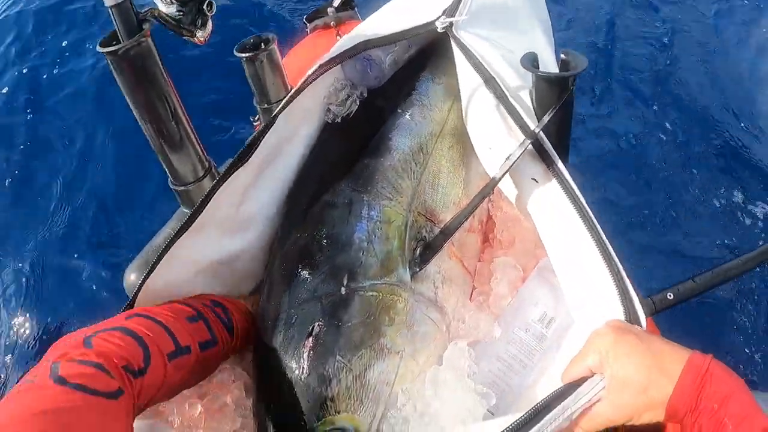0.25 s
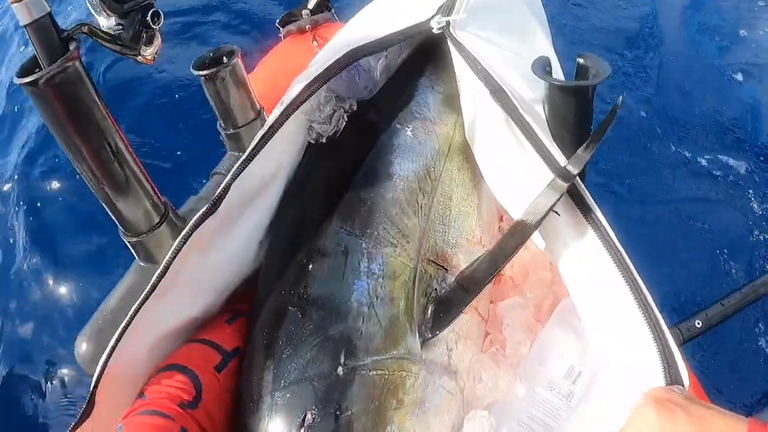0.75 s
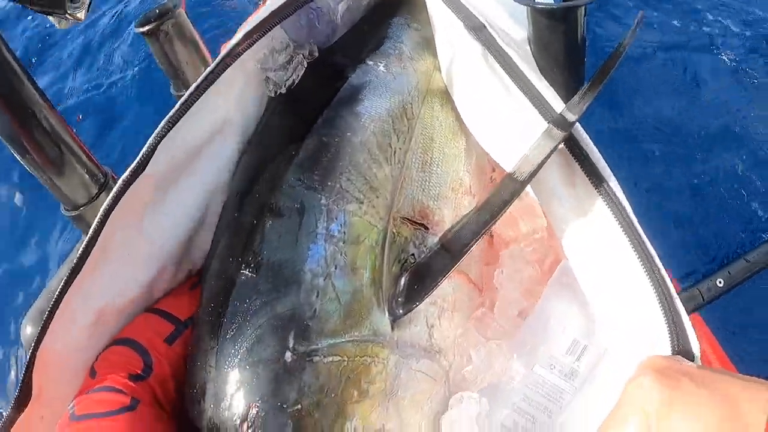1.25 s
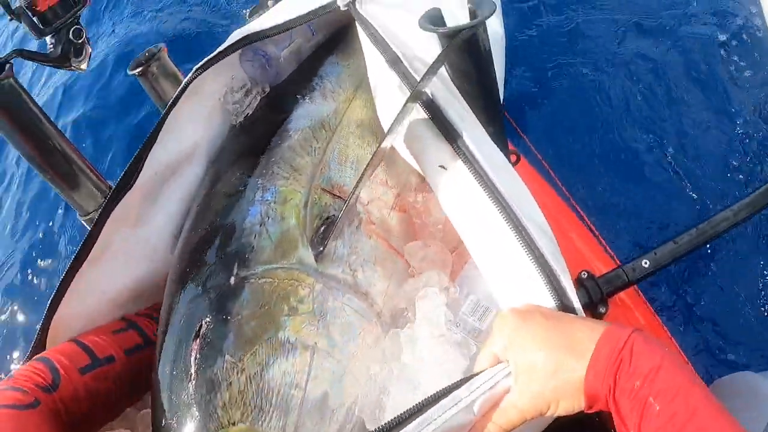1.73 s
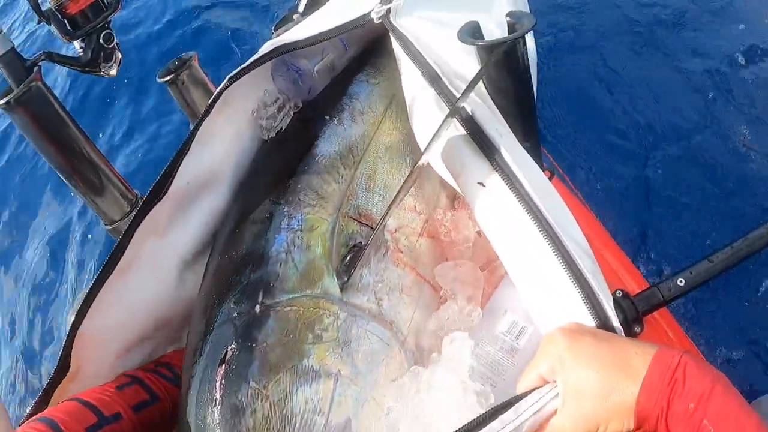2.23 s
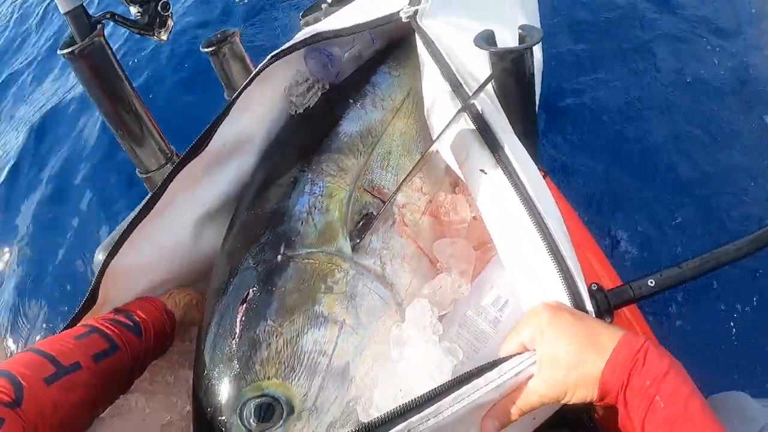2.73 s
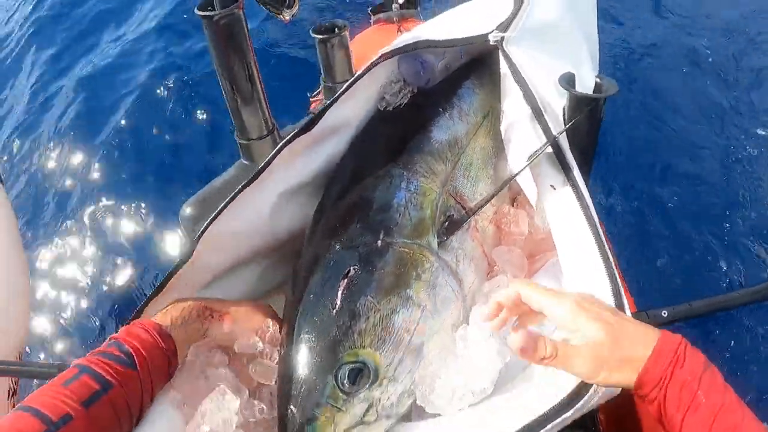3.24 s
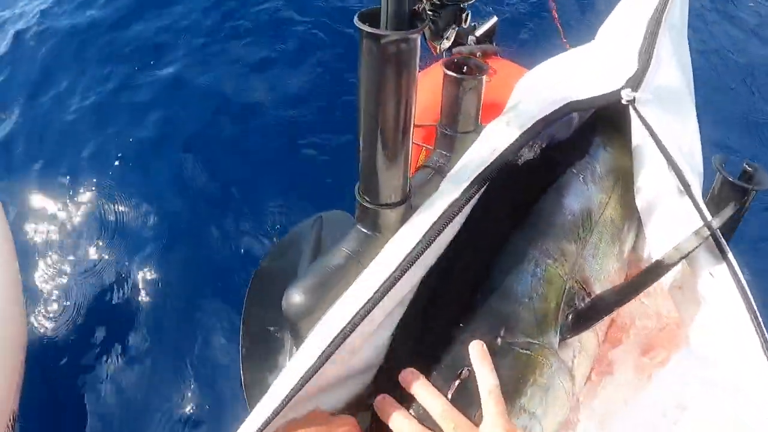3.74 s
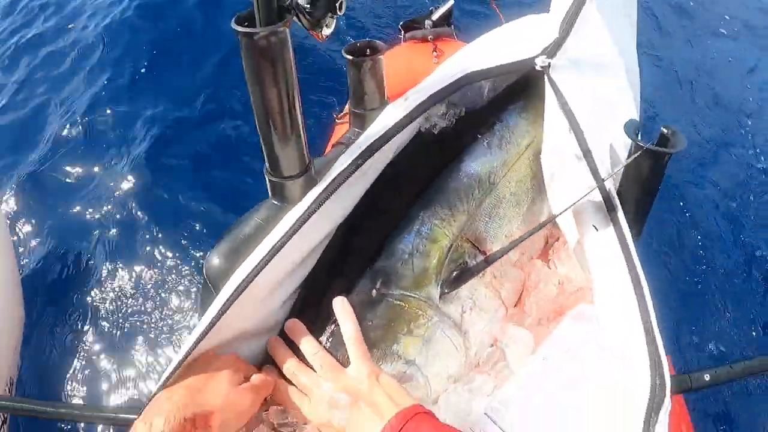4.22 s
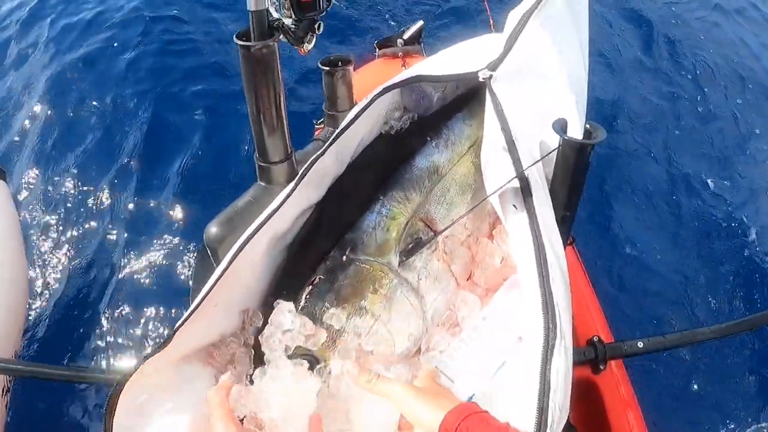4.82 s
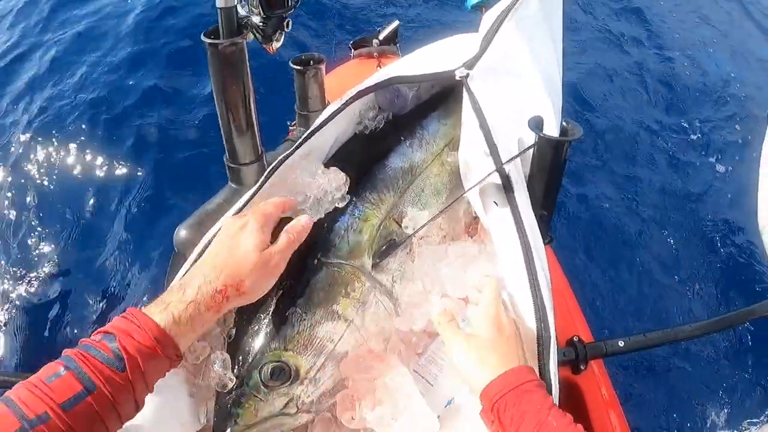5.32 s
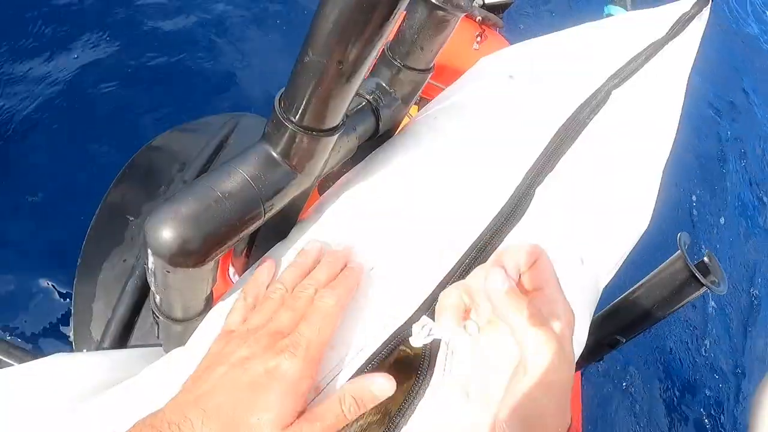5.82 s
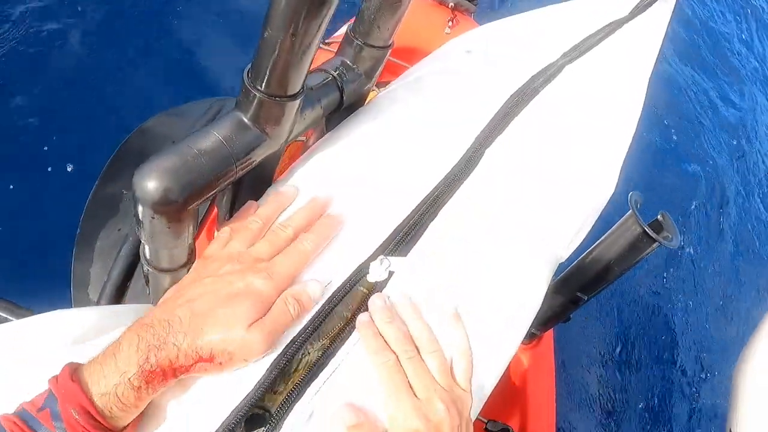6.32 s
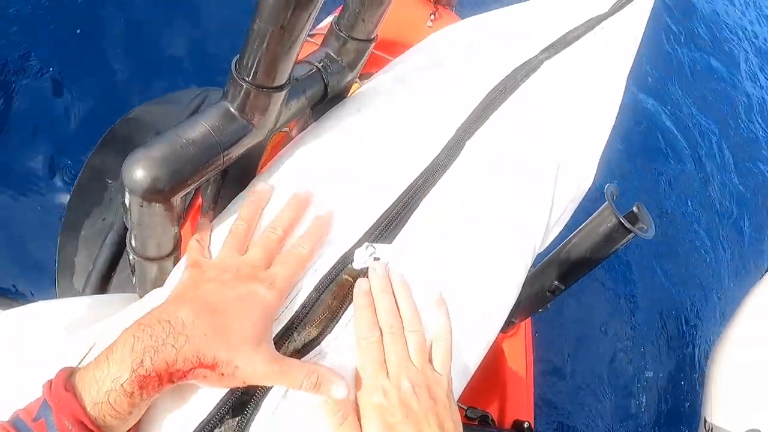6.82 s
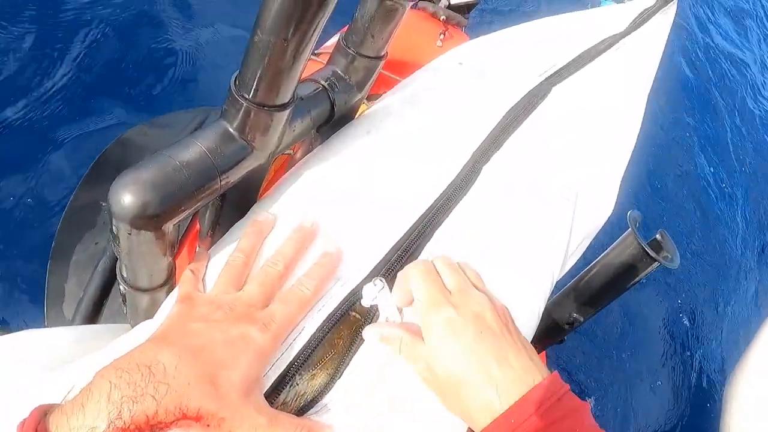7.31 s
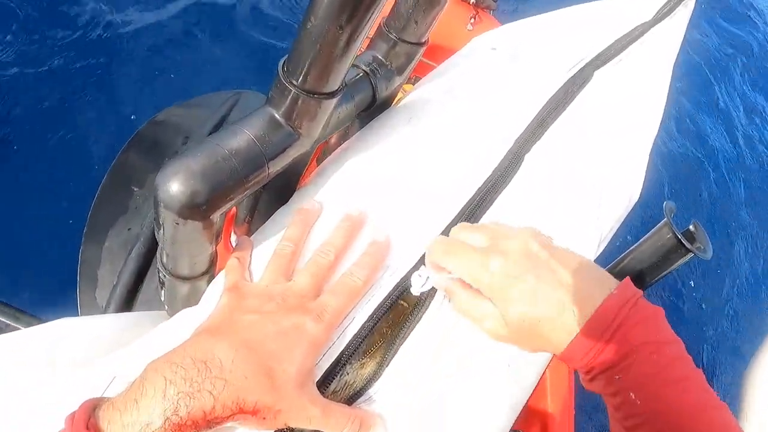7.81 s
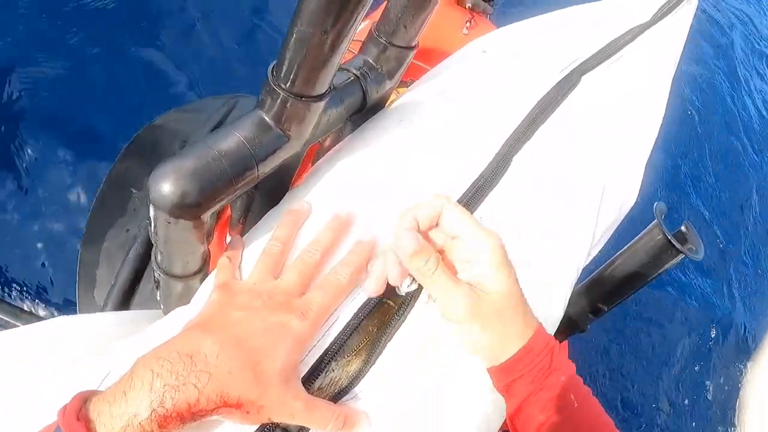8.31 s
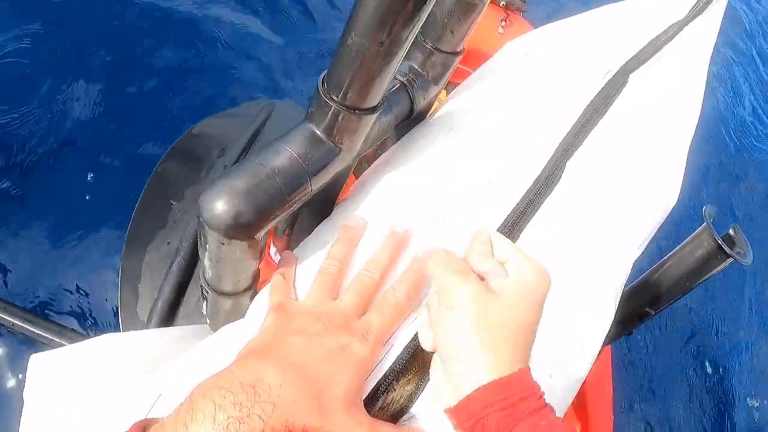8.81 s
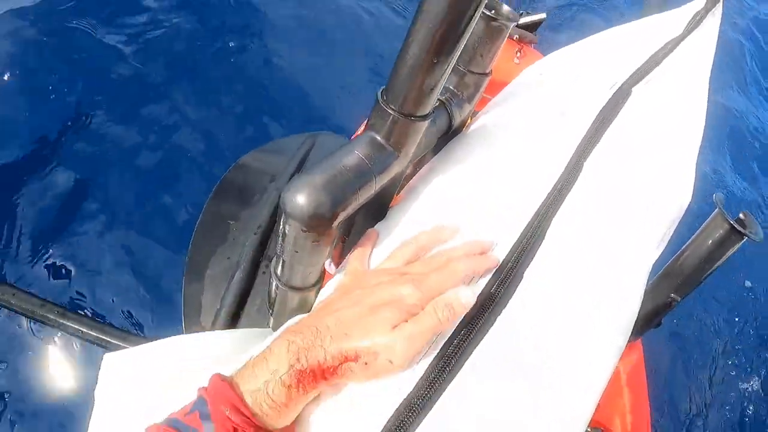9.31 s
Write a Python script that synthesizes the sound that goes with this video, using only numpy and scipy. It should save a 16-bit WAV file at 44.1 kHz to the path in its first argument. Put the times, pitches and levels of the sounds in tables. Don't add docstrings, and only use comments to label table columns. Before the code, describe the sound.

Close on a small boat at sea, hands push through wet crushed ice in a soft bag: slushy surges, dense clatter, heavy lumps and brittle cracks, with low wind rumbling on the microphone. Near six seconds it cuts to quieter handling of the closed bag: groaning vinyl, rubbery squeaks, small ticks, faint water blips, hollow hull thumps and a short zipper ratchet, ending in squeaks and a hard push.

```python
import sys
import numpy as np
from scipy import signal
from scipy.fft import rfft, irfft, next_fast_len
from scipy.io import wavfile
from scipy.ndimage import uniform_filter1d, map_coordinates

SR = 44100
rng = np.random.default_rng(int(sys.argv[2]) if len(sys.argv) > 2 else 0)


def ratio(d):
    e = np.asarray(d, float) / 20
    return 10 ** e


def unload_wav(signal):
    wavfile.write(
        sys.argv[1],
        SR,
        np.round(np.clip(np.atleast_2d(signal).T, -1, 1) * 32767).astype(np.int16),
    )


N = 421155
T = np.arange(N) / SR


def unit(x):
    return x / np.sqrt(np.mean(x ** 2) + 1e-20)


def curve(rows):
    s, value = np.transpose(rows)
    return np.interp(T, s, value)


def along(points, hz):
    at, db = np.transpose(points)
    return ratio(np.interp(np.log(hz + 1), np.log(at + 1), db))


def window(t0, t1, fade):
    return np.clip((T - t0) / fade, 0, 1) * np.clip((t1 - T) / fade, 0, 1)


def wobble(rate):
    return map_coordinates(rng.standard_normal(int(N * rate / SR) + 4), [T * rate])


def bandpass(x, low_hz, high_hz):
    return signal.sosfilt(signal.butter(2, [low_hz, high_hz], "bandpass", fs=SR, output="sos"), x)


def coloured(x, spectrum):
    size = next_fast_len(N + 8192)
    gain = along(spectrum, np.fft.rfftfreq(size, 1 / SR))
    return unit(irfft(rfft(x, size) * gain, size)[..., :N])


def gritty(per_second, spread_db, share, life):
    sizes = ratio(spread_db * np.minimum(rng.exponential(size=N), 2.6))
    hits = (rng.random(N) < per_second / SR) * sizes
    age = np.arange(SR // 20) / SR / life
    swell = unit(signal.fftconvolve(hits, age * np.exp(-age))[:N])
    return rng.standard_normal(N) * np.sqrt(1 - share + share * swell ** 2)


def swells(rows, rise, fall, bed_db):
    t = T[::64, None]
    s, hold, db, *cols = np.transpose(rows)
    row_db = db - rise * np.maximum(s - t, 0) - fall * np.maximum(t - s - hold, 0)
    power = ratio(2 * row_db) + ratio(2 * bed_db) / len(s)
    total = power.sum(axis=1)
    values = [10 * np.log10(total)] + [power @ c / total for c in cols]
    return [np.interp(T, t[:, 0], v) for v in values]


def spread(mid, side, pan_db=0):
    return np.array([(mid + side) * ratio(pan_db / 2), (mid - side) * ratio(-pan_db / 2)])


def add(out, s, sound, pan_db=0):
    at = round(s * SR)
    out[:, at:at + len(sound)] += (ratio([[pan_db / 2], [-pan_db / 2]]) * sound)[:, :N - at]


def ring(hz, t60, attack):
    t = np.arange(SR // 10) / SR
    return np.sin(2 * np.pi * hz * t) * ratio(-60 * t / t60) * (1 - np.exp(-t / attack))


def crack(t60, hz):
    t = np.arange(SR // 10) / SR
    noise = rng.standard_normal(len(t)) * ratio(-60 * t / t60) * (1 - np.exp(-t / 0.0002))
    burst = bandpass(noise, hz * 0.5, min(hz * 1.37, 9600))
    return burst / np.abs(burst).max()


# start in seconds, hold in seconds, buffet level in dB.
GUSTS = [(0, 0.67, -28.5), (1.15, 1.25, -43.5), (2.5, 1.2, -37.5), (3.6, 0.13, -25), (3.9, 0.21, -23.5),
         (4.4, 0.011, -27.5), (4.85, 0.093, -30), (5.2, 0.36, -37), (5.9, 0.043, -39), (6.06, 0.23, -28.5),
         (6.85, 0.081, -36), (7.38, 0.44, -42.5), (8.14, .02, -45.5), (8.6, 0.54, -51), (9.42, 0.12, -33.5)]
# frequency in Hz, density in dB per Hz.
BUFFET = [(8.8, -35), (15, -2.5), (54, -0.5), (130, -10.5), (222, -19.5), (244, -17), (400, -32),
          (520, -28), (880, -120)]


def wind():
    level_db = swells(GUSTS, rise=89, fall=94, bed_db=-59)[0] + 3.4 * wobble(16)
    mid, side = coloured(rng.standard_normal((2, N)), BUFFET)
    return ratio(level_db) * spread(mid, .52 * side)


def pings(count, level_db):
    out = np.zeros((2, N))
    for when, size, softness in rng.random((count, 3)):
        s, hz = 5.7 * when, 850 * 6.48 ** size
        ping = ring(hz, 24 / hz, 0.0012)[:SR // 20]
        add(out, s, ratio(level_db[round(s * SR)] - 24.0 * softness) * ping)
    return out


# start in seconds, hold in seconds, slosh level in dB, clatter above slosh in dB.
SHOVES = [(0, 0.086, -36, -2.5), (.12, 0.32, -36, 4), (.5, 0.47, -31.5, -3), (1.14, 0.063, -21.5, -0.5),
          (1.29, 0.1, -29, -3), (1.43, 0.006, -24.5, 0.5), (1.66, 0.073, -23.5, 2), (1.56, 0.028, -25, 0.5),
          (1.78, 0.25, -27, 1.5), (2.14, 0.13, -31, 0), (2.28, .01, -28, -0.5), (2.36, 0.21, -30, -2.5),
          (2.67, 0.07, -25.5, 0.5), (3.0, 0.089, -26.5, -1), (3.2, 0.22, -30.5, -6),
          (3.64, 0.017, -25.5, -4), (3.81, 0.14, -19, -6), (4.0, 0.15, -29.5, -5.5),
          (4.33, 0.0035, -27.5, -7.5), (4.42, 0.33, -33.5, 0.5), (4.81, 0.022, -22, -3),
          (5.03, 0.0071, -26, -3), (5.1, 0.11, -34, -4.5), (5.29, 0.095, -30, -2),
          (5.46, 0.08, -34.5, -7.5), (5.6, 0.021, -41.5, -5.5), (5.78, 0.012, -37.5, -7)]
# start in seconds, length in seconds, level change in dB.
PAUSES = [
    (1.225, 0.055, -1),
    (1.483, 0.05, -2.5),
    (2.726, 0.13, -6),
]
# time in seconds, treble gain in dB.
BRIGHT = [(0, 7), (.45, 3), (.9, -7.5), (2.3, -2.5), (2.7, 2), (4.5, 3), (5.05, 7.5), (5.8, 3.5)]
# frequency in Hz, density in dB per Hz.
SLOSH = [(60, -16.5), (175, 0.5), (474, -5.5), (606, -2.5), (1390, -15.5), (1670, -24), (2000, -22),
         (2600, -30), (4400, -120)]
# frequency in Hz, density in dB per Hz.
CLATTER = [(410, -5.5), (700, -5.5), (1390, -7), (1670, -6.5), (3630, -12), (6350, -22.5), (8230, -24.5),
           (11400, -39.5), (13600, -26.5), (15500, -55)]


def shovelled_ice():
    slosh_db, clatter_db = swells(SHOVES, rise=110, fall=138, bed_db=-47)
    for s, length, db in PAUSES:
        slosh_db = slosh_db + db * window(s, s + length, 0.011)
    clatter_db = slosh_db + clatter_db
    surge = wobble(22.09)

    water = coloured(gritty(200, spread_db=2.5, share=0.54, life=0.0027), SLOSH)
    slosh = ratio(slosh_db + 0.62 * surge + 1.03 * wobble(30)) * water

    large, small = [coloured(gritty(450, spread_db=5, share=0.54, life=0.0014), CLATTER) for _ in range(2)]
    large = signal.sosfilt(signal.butter(2, 3100, "low", fs=SR, output="sos"), large)
    small = signal.sosfilt(signal.butter(2, 3100, "high", fs=SR, output="sos"), small)
    clatter = large + ratio(curve(BRIGHT) + 1.48 * wobble(35)) * small
    clatter = ratio(clatter_db + surge) * clatter
    flow = 0.8 * (slosh + clatter) * window(-1, 5.82, 0.017)
    return flow + pings(count=1100, level_db=clatter_db + 12.5)


# time in seconds, peak in dB, ring in Hz.
LUMPS = [(0.511, -13.5, 950), (1.051, -6, 610), (2.67, -11, 248), (2.868, -17, 243), (3.064, -8, 774),
         (4.808, -16, 420), (4.878, -12, 450), (4.918, -11, 378), (4.988, -12, 480), (5.029, -10.5, 190),
         (5.118, -17, 430), (5.143, -19, 400), (5.334, -10, 420), (5.19, -12.5, 244), (5.228, -11.5, 268),
         (5.296, -4.5, 448), (5.311, -3.5, 338), (5.363, -2.5, 243), (5.383, -5.5, 186), (5.635, -19, 377)]


def lumps():
    out = np.zeros((2, N))
    for s, db, hz in LUMPS:
        add(out, s, ratio(db - 2.5) * (ring(hz, 6 / hz, 0.00065) + 0.51 * crack(0.04, 1.54 * hz)))
    return out


# time in seconds, peak in dB, ring in Hz.
CHIPS = [(1.0535, -23, 2240), (4.036, -20, 2720), (4.193, -19.5, 3780), (4.3987, -19, 3460),
         (4.8274, -19, 2330), (4.9344, -20, 4300), (5.101, -20, 1890), (5.1993, -11.5, 2000),
         (5.214, -12, 3610), (5.243, -18, 1990), (5.2742, -15, 3780), (5.2859, -16, 2760),
         (5.3158, -15, 2040), (5.341, -9.5, 3550), (5.363, -10, 2370), (5.448, -13, 3070),
         (5.523, -16.5, 4260)]


def chips():
    out = np.zeros((2, N))
    for s, db, hz in CHIPS:
        add(out, s, ratio(db - 3.0) * (0.51 * ring(hz, 0.028, 0.00045) + 0.8 * crack(0.04, hz)))
    return out


# start in
# seconds, length in seconds, level in dB, band centre in Hz, width in octaves.
RUBS = [(5.785, 0.016, -40.5, 2400, .8), (5.958, 0.034, -48, 900, 1.2), (6.149, 0.035, -43, 1300, 1.4),
        (6.499, 0.021, -50.5, 1100, 1.1), (7.16, 0.038, -42.5, 4860, 0.36), (7.536, 0.027, -48, 1780, 0.84),
        (7.768, 0.11, -42.5, 324, 1), (7.821, 0.053, -49, 955, .6), (8, .11, -42.5, 320, 0.81),
        (8.09, 0.065, -49, 1270, 1), (8.176, 0.033, -45.5, 600, 1.1), (8.238, 0.056, -43.5, 1090, 1),
        (8.26, .045, -42.5, 170, .7), (9.112, 0.061, -39.5, 6600, 0.44), (9.321, 0.16, -36.5, 7000, 0.41),
        (9.432, 0.036, -35, 4680, .15), (9.4, 0.093, -35, 3900, .3), (9.125, 0.055, -31.5, 1330, 0.43),
        (9.419, 0.065, -37, 2260, .15), (1.131, .09, -31, 2240, 0.43), (1.1, 0.12, -29, 185, 0.54),
        (1.582, 0.17, -30.5, 1600, 0.52), (2.5, 0.19, -34, 192, 0.32), (4.76, 0.065, -27.5, 1050, .8)]


def rubs():
    out, t = np.zeros((2, N)), np.arange(SR // 3) / SR
    for s, length, db, hz, octaves in RUBS:
        noise = rng.standard_normal(len(t))
        noise = unit(bandpass(noise, hz * 2 ** (-octaves / 2), hz * 2 ** (octaves / 2)))
        noise = noise * ratio(2.5 * wobble(44.3)[:len(t)])
        stroke = np.clip(t / 0.011, 0, 1) * np.clip((length - t) / 0.013 + 1, 0, 1)
        add(out, s, ratio(db) * noise * stroke, rng.normal(-1.6, 2.6))
    return out


def stick_slip(rates, strokes, roughness, falls, radiation, hiss_spectrum, folds, jitter, fade):
    tone, gate, snaps = np.zeros((3, N))
    for rows, (level_db, swell_db, hiss_db), rough, fall_db in zip(rates, strokes, roughness, falls):
        t0, t1 = rows[0][0], rows[-1][0]
        live = window(t0, t1, fade)
        hz = uniform_filter1d(curve(rows), size=170)
        swell = swell_db * np.clip((T - t0) / (t1 - t0) - .5, -1, 1)
        grip = 8.5 * (1 - window(t0, t1, 0.017))
        db = level_db + swell - grip
        phase = 2 * np.pi * np.cumsum(hz * (1 + jitter * rough * wobble(300))) / SR
        stack = np.zeros(N)
        for k in range(1, 7):
            gain = radiation(k * hz) * ratio(12.7 * rough * wobble(70) - fall_db * (k - 1))
            stack += gain * np.cos(k * phase + 0.68 * k * k)
        tone += live * ratio(db) * stack / np.sqrt(np.mean(stack[live > 0] ** 2))
        hiss_gain = live * ratio(db + hiss_db)
        gate += hiss_gain * 1.6 * (.2 + .85 * np.cos(phase / 2) ** 4)
        slips = np.diff(np.floor(phase / (2 * np.pi) + .5), prepend=0)
        snaps += (1 - rough) ** 2 * hiss_gain * slips
    hiss = gate * coloured(rng.standard_normal(N), hiss_spectrum)
    for low_hz, high_hz, fold_db in folds:
        hiss = hiss + ratio(fold_db) * bandpass(snaps, low_hz, high_hz)
    mid = tone + hiss
    return spread(mid, 0.12 * np.roll(mid, 90), pan_db=-0.5)


# time in seconds, rate in slips per second.
FINGER_RATE = [
    [(7.17, 470), (7.185, 464), (7.203, 455)],
    [(7.22, 680), (7.248, 830)],
    [(7.322, 400), (7.336, 350), (7.358, 530), (7.372, 490), (7.392, 290), (7.41, 350), (7.43, 520),
     (7.447, 530)],
    [(8.962, 330), (8.986, 470), (9.0, 415), (9.022, 580), (9.033, 500), (9.052, 400)],
    [(9.06, 330), (9.08, 400), (9.09, 560), (9.104, 830)],
    [(9.12, 420), (9.145, 450), (9.172, 440), (9.195, 250)],
    [(9.312, 300), (9.322, 330), (9.36, 640)],
    [(9.36, 280), (9.375, 335), (9.39, 358), (9.41, 345), (9.467, 435), (9.485, 370), (9.507, 380),
     (9.527, 270), (9.555, 190)],
    [(3.27, 280), (3.31, 470), (3.43, 310)],
    [(9.482, 720), (9.507, 765), (9.527, 550)],
    [(7.535, 720), (7.57, 790)],
    [(7.61, 720), (7.632, 1460)],
]
# level in dB, swell along the stroke in dB, hiss above tone in dB.
FINGER_STROKES = [(-22, 2, -12), (-29, -13, -12), (-25.5, -8, -11), (-18, 5, -9.5), (-26.5, -16, -27),
                  (-27.5, 0, -5.5), (-24.5, 12, -8.5), (-20.5, 2, -6), (-33, -6, -11), (-22, -7, -20),
                  (-39, 0, 1), (-38.5, 4, -1)]
FINGER_ROUGH = [.25, .2, .14, .1, .15, .25, .15, .12, .15, .1, .2, .1]
# fall from one overtone to the next in one stroke, in dB.
FINGER_FALL = [5, 9, 0, 0, 3.5, 9, 9, 0.5, 1, 12, 1, 4]
# frequency in Hz, gain in dB.
VINYL = [(200, -7.5), (450, 4), (750, -10.5), (1080, 0), (1350, -7.5), (1750, -12.5), (2400, -22.5),
         (3500, -41)]
# frequency in Hz, density in dB per Hz.
SCRUB = [(530, -3.5), (900, -3.5), (1650, -2.5), (1910, -24), (2250, -11.5), (3070, -24), (3810, -20),
         (7420, -15.5), (15500, -53)]


def finger_squeaks():
    return stick_slip(FINGER_RATE, FINGER_STROKES, FINGER_ROUGH, FINGER_FALL, lambda hz: along(VINYL, hz),
                      SCRUB, folds=[(3600, 5000, 18)], jitter=0.13, fade=0.0011)


# time in seconds, peak in
# dB, centre in Hz.
CRUMBS = [(4.4656, -16.5, 1860), (4.5745, -26, 2300), (4.6039, -27, 3430), (4.6239, -22, 3250),
          (4.6438, -26, 2470), (4.6643, -15, 2950), (4.6932, -14, 3670), (4.7431, -24, 3470),
          (4.79, -11, 1600), (4.824, -16, 2340),
          (4.8744, -28, 1770), (4.9122, -22, 4070), (4.997, -20, 1620), (5.0344, -10, 1640),
          (5.1516, -26, 1510), (5.2544, -17, 3690), (5.3894, -22, 2200), (5.4231, -27, 2070),
          (5.5825, -29, 4180), (5.6096, -23, 1650), (5.6274, -26, 1540)]


def trickle():
    out = np.zeros((2, N))
    for s, db, hz in CRUMBS:
        add(out, s, ratio(db - 2.5) * crack(.012, hz))
    return out


# time in seconds, peak in dB, pitch in Hz.
DRIPS = [(5.757, -35, 500), (5.77, -35, 950), (5.865, -39, 1100), (5.89, -39, 1200), (5.935, -34, 720),
         (5.948, -37, 410), (6.043, -30.5, 1400), (6.103, -36, 1404), (6.155, -31, 420), (6.463, -35, 430),
         (6.492, -34, 480), (6.511, -32, 466), (6.58, -31, 655), (6.632, -29, 455), (6.66, -31, 1150),
         (6.678, -35, 1500), (7.518, -38, 780), (7.85, -46, 950), (7.935, -46, 1300), (8.11, -37, 1050),
         (8.13, -39, 1140), (8.22, -39, 1250), (8.34, -39, 1050), (8.35, -41, 800), (8.416, -37, 2080),
         (8.452, -38, 259), (8.472, -39, 1000), (8.498, -30, 1540), (8.598, -38, 1150), (8.65, -37, 890),
         (8.665, -32.5, 1120), (8.69, -39, 1350)]


def bubbles():
    out, t = np.zeros((2, N)), np.arange(SR // 16) / SR
    for (s, db, hz), place in zip(DRIPS, rng.random(len(DRIPS))):
        age = t * hz / 2.1
        tone = np.sin(2 * np.pi * hz * t * (1 + 0.015 * age)) * age * np.exp(1 - age)
        add(out, s, ratio(db) * tone, 6 * place - 5)
    return out


# start in seconds, hold in seconds, body level in dB, hiss above body in dB.
PRESSES = [
    (5.8, 0.41, -46.5, 0),
    (6.28, 0.049, -37.5, -3.5),
    (6.45, 0.46, -43, -6.5),
    (7.04, 0.039, -35.5, -11.5),
    (7.38, 0.022, -46.5, -4),
    (7.54, 0.46, -54, -6.5),
    (8.12, .3, -51.5, -5),
    (8.5, 0.47, -50, -3),
    (9.02, 0.017, -33.5, -6.5),
    (9.42, 0.04, -28.5, -7),
]
# frequency in Hz, density in dB per Hz.
BODY = [(130, -21), (220, 1.5), (400, -2), (1000, -8), (1500, -9.5), (2300, -18), (3500, -51)]
# frequency in Hz, density in dB per Hz.
HISS = [(1200, -23), (2000, -6.5), (3000, -10.5), (5500, -7.5), (8500, -15), (10500, -30.5), (15500, -63)]


def closed_bag():
    body_db, hiss_db = swells(PRESSES, rise=81, fall=68, bed_db=-57)
    hiss_db = body_db + hiss_db
    body_db = np.minimum(body_db, -37)
    body = [coloured(gritty(60, spread_db=3.0, share=0.67, life=0.0049), BODY) for _ in range(2)]
    hiss = [coloured(gritty(110, spread_db=4, share=.5, life=.001), HISS) for _ in range(2)]
    low = ratio(body_db + 3.0 + wobble(22)) * spread(body[0], 0.22 * body[1], pan_db=-1.0)
    high = ratio(hiss_db - 0.5 + 2.2 * wobble(30)) * spread(hiss[0], 0.17 * hiss[1], pan_db=-0.5)
    return (low + high) * window(5.78, 10, 0.022)


# start in seconds, hold in seconds, drum level in dB.
LOADS = [
    (6.05, .01, -42),
    (6.3, 0.061, -25),
    (6.46, 0.75, -32.5),
    (7.76, 0.024, -35),
    (8.03, 0.13, -38),
    (8.3, .24, -48),
    (8.85, 0.026, -32),
    (8.96, 0.027, -23),
    (9.2, .01, -30.5),
    (9.41, .14, -22.5),
]
# frequency in Hz, density in dB per Hz.
DRUM = [(60, -22), (105, 7.5), (150, 5), (190, 5), (320, -46)]


def hull_drum():
    drum = coloured(rng.standard_normal((2, N)), DRUM)
    level_db = swells(LOADS, rise=190, fall=164, bed_db=-58)[0] - 4.0
    return ratio(level_db) * spread(drum[0], 0.062 * drum[1], pan_db=-0.8) * window(5.78, 10, 0.022)


# time in seconds, peak in dB, centre in Hz.
TICKS = [(5.809, -19.5, 4460), (5.9155, -31, 4410), (6.0126, -20.5, 2613), (6.0392, -15, 4980),
         (6.0612, -23, 9270), (6.146, -25, 5370), (6.1854, -22, 4770), (6.3124, -21.5, 6510),
         (6.6078, -19.5, 2650), (6.6316, -21, 3070), (6.657, -23, 2640), (7.33, -21, 6530),
         (7.4155, -21, 6980), (7.426, -15, 7000), (7.448, -19.5, 6490), (7.4899, -27, 4730),
         (7.7624, -11.5, 6750), (7.762, -22.5, 1080), (8.354, -18, 4800), (8.3591, -12.5, 5430),
         (8.3933, -27, 5560), (8.4483, -23, 4100), (8.449, -36, 9270), (8.519, -13.5, 6480),
         (8.5195, -23, 9270), (8.6164, -25, 2310), (8.765, -21, 5500)]
# frequency in Hz, level in dB, 60 dB decay in seconds.
PULLER = [(4100, 2, 0.038), (6750, 11, 0.013), (9270, 4, 0.026)]


def ticks():
    out = np.zeros((2, N))
    for s, db, hz in TICKS:
        tick = 0.41 * ring(hz, 0.013, 0.00015) + 0.82 * crack(0.015, hz)
        if min(abs(hz / mode_hz - 1) for mode_hz, _, _ in PULLER) < .04:
            for mode_hz, level, t60 in PULLER:
                mode_db = level - 20.0 * abs(np.log2(hz / mode_hz)) + rng.normal(0, 2.5)
                tick = tick + 0.55 * ratio(mode_db) * ring(mode_hz, t60, 0.00028)
        add(out, s, ratio(db - 2.5) * tick, rng.normal(-1.5, 3.2))
    return out


# time in seconds, peak in dB, centre in Hz.
CREASES = [(6.1644, -25, 1760), (6.4762, -38, 1900), (6.4907, -31, 3500), (6.559, -36, 1580),
           (6.786, -21, 6930), (6.8089, -31, 5640), (6.8234, -29, 2330), (6.9481, -37, 2400),
           (6.9664, -34, 2600), (7.1314, -40, 2550), (7.2614, -32, 3500), (7.2843, -32.5, 6800),
           (7.3003, -32, 6460), (7.3474, -23, 4500), (7.5044, -37, 9250), (7.6036, -35, 6060),
           (7.876, -36, 3540), (7.895, -36, 4160), (8.0127, -40, 6340), (8.0336, -42, 6630),
           (8.1434, -41, 3070), (8.2526, -34, 4470), (8.2726, -35, 2470), (8.2924, -38, 2320),
           (8.3105, -32, 6130), (8.3274, -39, 5590), (8.4154, -32, 3940), (8.602, -26, 4300),
           (8.6552, -36, 5440), (8.6692, -35, 5940), (8.7151, -37, 2310), (8.7281, -31, 5440),
           (8.8059, -35, 3830), (9.0514, -23, 2410), (9.0614, -20, 2430), (9.2269, -34.5, 8370)]


def creases():
    out = np.zeros((2, N))
    for s, db, hz in CREASES:
        click = 0.54 * ring(hz, 0.014, .0002) + 0.79 * crack(0.01, hz)
        add(out, s, ratio(db - 2.5) * click, rng.normal(-1.3, 3.6))
    return out


# start in seconds, length in seconds, peak in dB.
CREAK_RUNS = [
    (6.268, .03, -19),
    (6.3, .095, -13.5),
    (7.004, .02, -13),
    (7.026, .05, -8.5),
    (7.098, .03, -8.5),
    (7.153, .024, -14),
]
# time in seconds, peak in dB, ring in Hz.
CREAKS = [
    (6.538, -22.5, 480),
    (6.598, -13.5, 620),
    (7.76, -18, 121),
    (8.519, -23.5, 156),
    (8.614, -29, 199),
    (8.687, -28, 192),
    (8.734, -25.5, 158),
    (8.763, -27, 111),
    (8.947, -17, 178),
]


def creaks():
    out = np.zeros((2, N))
    for start, length, db in CREAK_RUNS:
        for s in np.arange(start, start + length, .0085):
            late, loud, pitch = rng.normal(size=3)
            hz = 445 * (1 + 0.12 * np.clip(pitch, -2, 2))
            skin = ring(hz, 10 / hz, 0.0012) + 0.11 * crack(0.01, 2.4 * hz)
            skin = skin + 0.06 * crack(0.009, 2500) + 0.035 * crack(.006, 4800)
            belly = ring(156, 0.026, .0005)
            add(out, s + 0.0006 * late, ratio(db + 2.0 * loud) * skin + ratio(db - 12) * belly, -2.5)
    for s, db, hz in CREAKS:
        slip = ring(hz, 6.0 / hz, 0.00028) + 0.45 * crack(0.013, 1.52 * hz)
        add(out, s, ratio(db + 1.5) * slip, rng.normal(-5.0, 3.1))
    return out


# time in seconds, rate in slips per second.
PALM_RATE = [
    [(6.285, 146), (6.335, 156), (6.395, 172), (6.405, 200)],
    [(6.727, 194), (6.75, 193), (6.792, 173)],
    [(6.835, 174), (6.878, 160)],
    [(6.862, 153), (6.897, 242), (6.93, 175)],
]
# level in dB, swell along the stroke in dB, hiss above tone in dB.
PALM_STROKES = [(-19, 6, -16), (-14.5, -5, -14.5), (-23.5, 1, -9.5), (-19.5, 3, -12)]
PALM_ROUGH = [.33, .12, .3, .22]
# frequency in Hz, density in dB per Hz.
PALM = [(600, -6.5), (1200, -10.5), (1600, -2.5), (2250, -16), (2800, -12.5), (6500, -19), (15500, -61)]


def palm_squeaks():
    return stick_slip(PALM_RATE, PALM_STROKES, PALM_ROUGH, [7] * len(PALM_RATE), lambda hz: 1, PALM,
                      folds=[(1700, 2600, 41), (3600, 5200, 16)], jitter=.2, fade=0.0072)


# time in seconds, peak in dB.
RATCHET = [(8.503, -39), (8.656, -39), (8.774, -28.5), (8.806, -26), (8.832, -27), (8.846, -25),
           (8.861, -31), (8.888, -26), (8.904, -31), (8.927, -25)]


def zip_teeth():
    out = np.zeros((2, N))
    free_run = [(8.936 + .009 * k, -26 + .8 * k) for k in range(7)]
    for s, db in RATCHET + free_run:
        hz, knock_db = 1000 * (1 + 0.055 * rng.normal()), -5 + 3 * rng.normal()
        tooth = ring(hz, 0.024, 0.003) + 0.2 * crack(0.031, 1.04 * hz)
        knock = ring(157, 0.079, 0.0012)
        add(out, s, ratio(db + 8.0) * tooth + ratio(db + knock_db + 7.5) * knock, -1.5)
    return out


def scene():
    shovelling = shovelled_ice() + lumps() + chips() + trickle()
    pressing = closed_bag() + hull_drum() + bubbles() + rubs()
    squeaking = finger_squeaks() + palm_squeaks()
    handling = ticks() + creases() + creaks() + zip_teeth()
    return wind() + shovelling + pressing + squeaking + handling


def roll_off(x):
    return signal.sosfilt(signal.butter(12, 15680, fs=SR, output="sos"), x)


# frequency in Hz, density in dB per Hz.
PORT_HISS = [(9500, -60), (11500, -4.5), (14500, -2), (15700, -30)]


def record(dry):
    mid, side = (dry[0] + dry[1]) / 2, (dry[0] - dry[1]) / 2
    dull = signal.butter(4, 10300, fs=SR, output="sos")
    ports = signal.sosfilt(dull, spread(mid, side * (T > 5.79)))
    treble = np.sqrt(np.abs(uniform_filter1d(np.diff(mid, prepend=0) ** 2, size=300)))
    ports = ports + ratio(-32) * treble * coloured(rng.standard_normal((2, N)), PORT_HISS)
    return roll_off(ports)


dry = scene()
out = record(dry)
unload_wav(out)
```